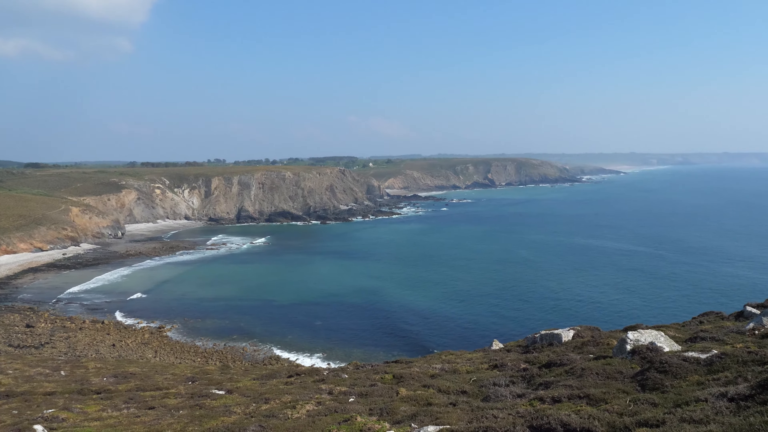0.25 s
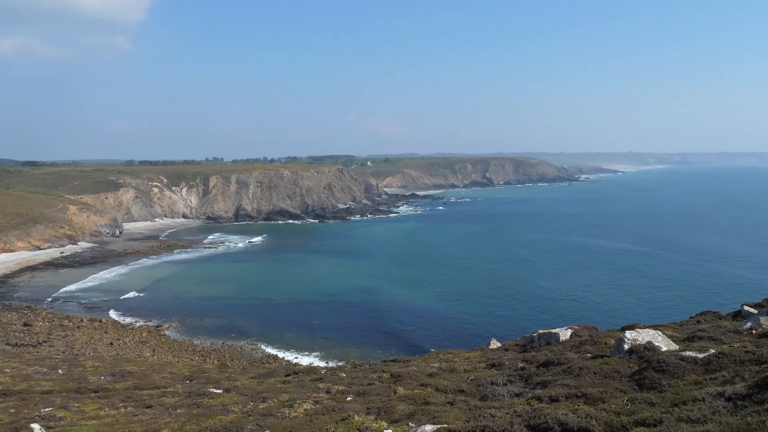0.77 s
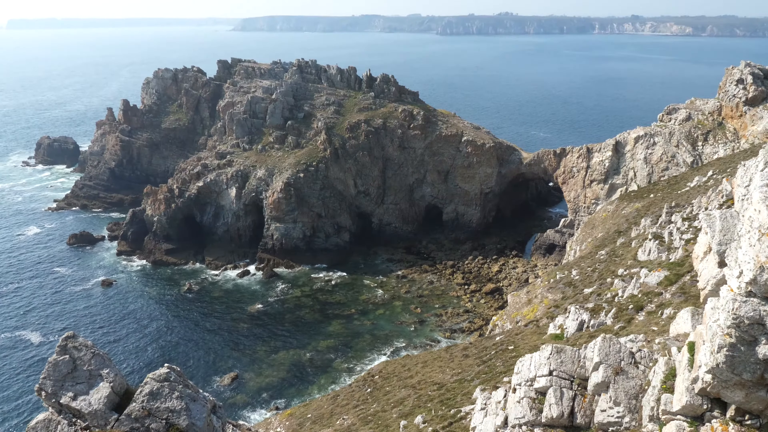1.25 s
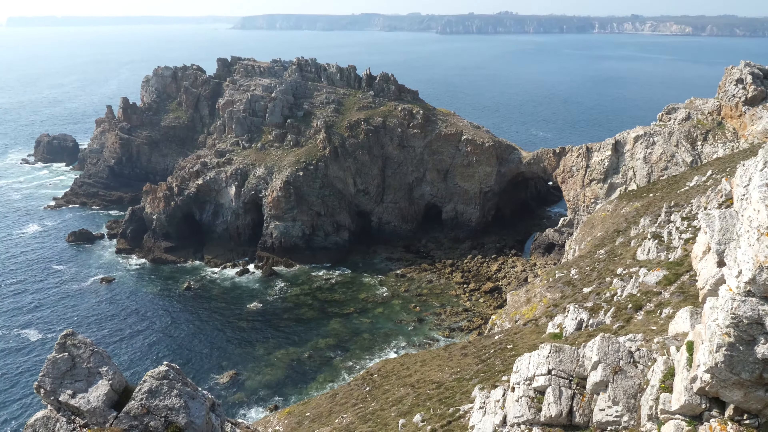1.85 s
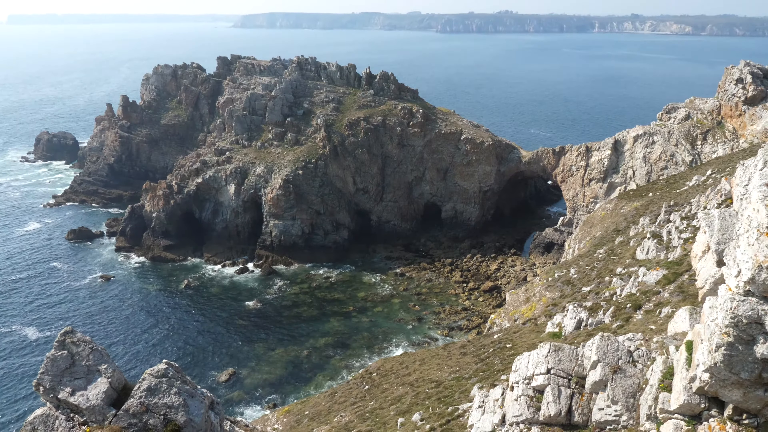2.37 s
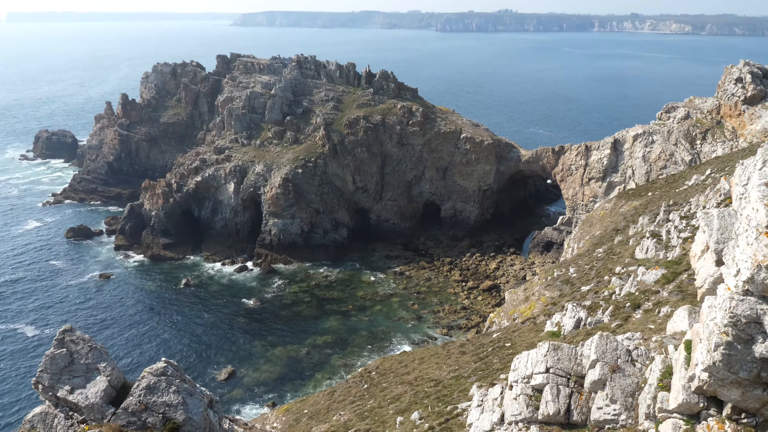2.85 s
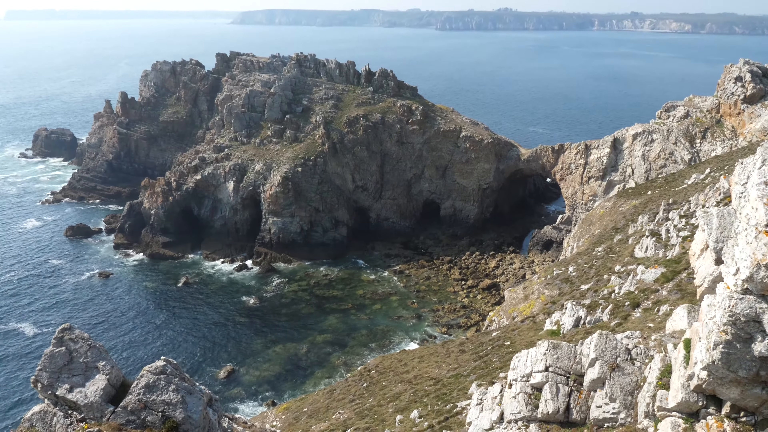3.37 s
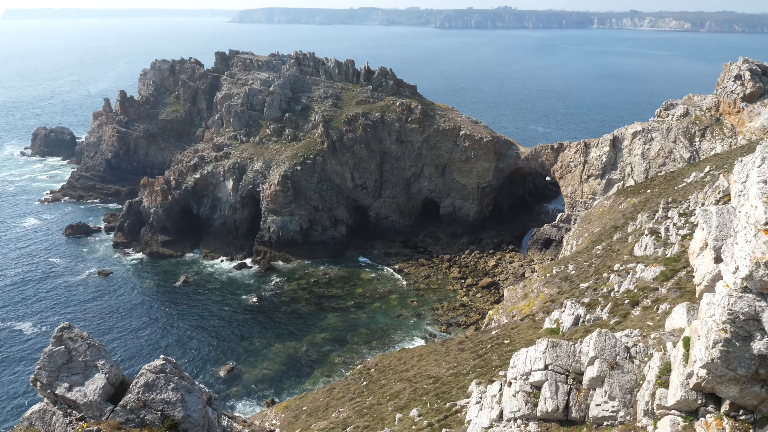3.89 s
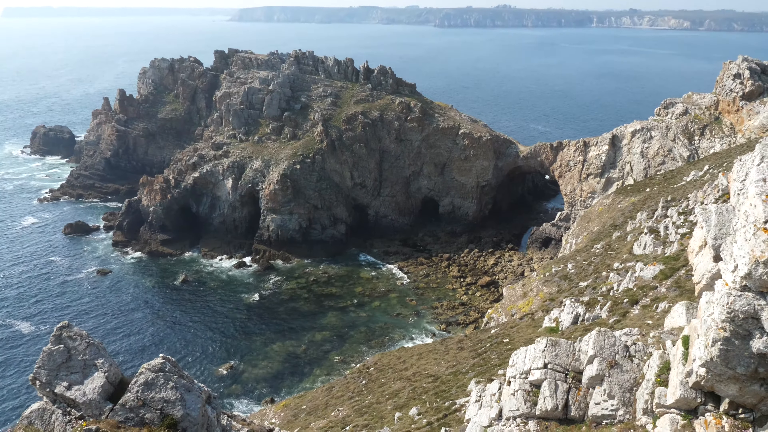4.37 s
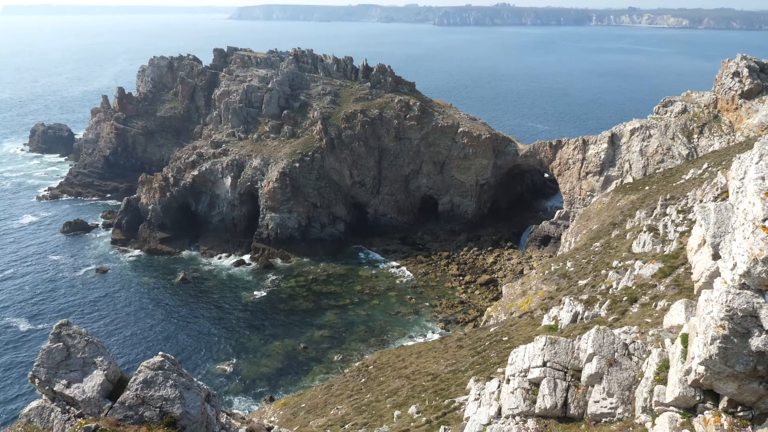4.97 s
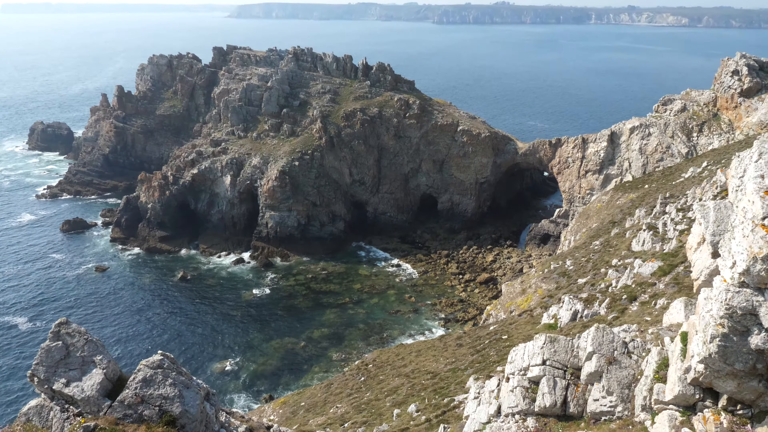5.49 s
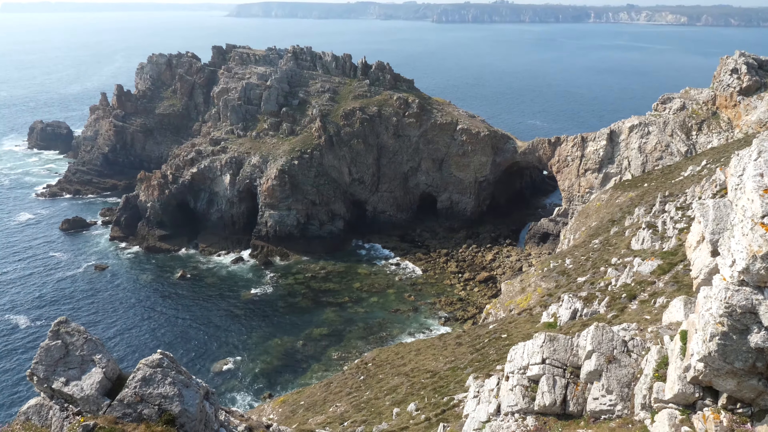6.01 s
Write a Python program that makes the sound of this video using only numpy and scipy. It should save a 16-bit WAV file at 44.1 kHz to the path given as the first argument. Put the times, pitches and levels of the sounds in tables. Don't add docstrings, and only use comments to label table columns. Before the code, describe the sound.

A far bay murmurs, cuts out, then nearer waves wash a rocky cove as a bird chirps and wind buffets the microphone.

```python
import sys
import numpy as np
from scipy import signal
from scipy.io import wavfile
from scipy.ndimage import uniform_filter1d

SR = 44100
rng = np.random.default_rng(int(sys.argv[2]) if len(sys.argv) > 2 else 0)


def attenuation_scalar(level_db):
    decades = np.asarray(level_db, float) / 20
    return 10 ** decades


def waveform_to_disk(signal):
    frames = np.transpose(np.atleast_2d(signal))
    scaled = np.clip(frames, -1, 1) * 32767
    samples = np.round(scaled).astype(np.int16)
    wavfile.write(sys.argv[1], SR, samples)


N = 275625
CUT_S, RESUME_S = .9428, 1.2187


def evened(x):
    return x / np.sqrt(np.mean(abs(x) ** 2) + 1e-20)


def read(points, hz):
    f, value = np.transpose(points)
    return np.interp(np.log(hz + 1), np.log(f + 1), value)


def add(mix, s, sound):
    part = mix[..., round(s * SR):][..., :sound.shape[-1]]
    part += sound[..., :part.shape[-1]]


def control(points):
    s, db = np.transpose(points)
    return np.interp(np.arange(N) / SR, s, db)


def bump(s, rise, fall):
    t = np.arange(N) / SR - s
    return np.exp(-np.where(t < 0, (t / rise) ** 2, t / fall))


# (frequency [Hz], likeness [0-1])
CHANNEL_LIKENESS = [(60, 1), (290, 1), (640, 1), (1100, 0.96), (2000, 0.89), (3100, .92), (6400, 0.93),
                    (7000, 0.96), (10000, .999), (10600, 0.89), (15000, 0.63)]
# (frequency [Hz], left minus right [dB])
PORT_TILT = [(60, 0.0), (130, 0.0), (290, 0.5), (640, 0.5), (1410, 2.0), (3100, 1.0), (6820, 0.5),
             (15000, 0.0)]
# (frequency [Hz], left leads by [radians])
PORT_LEAD = [(200, 0), (500, 0.18), (1030, 0.39), (2000, 0.12), (3450, -.1), (5250, .1), (6630, 0)]


def wash(colour, lo_hz, hi_hz, patchy_db, flicker_db, size=1024):
    frames, hz = 4 * N // size + 5, np.fft.rfftfreq(size, 1 / SR)
    a, b, c, d, patches = rng.standard_normal((frames, len(hz), 5)).T
    flicker = evened(uniform_filter1d(patches[0], size=2))
    patches = uniform_filter1d(patches, size=12, axis=0)
    patches = evened(uniform_filter1d(patches, size=10, axis=1))
    same = np.clip(read(CHANNEL_LIKENESS, hz), 0, 1)[:, None]
    left = a + 1j * b
    right = same * left + np.sqrt(1 - same ** 2) * (c + 1j * d)
    port = (attenuation_scalar(read(PORT_TILT, hz) / 2) * np.exp(.5j * read(PORT_LEAD, hz)))[:, None]
    shape = attenuation_scalar(read(colour, hz)) * (hz > colour[0][0] / 2)
    drift = attenuation_scalar(patchy_db * patches + flicker_db * flicker)
    z = np.array([left * port, right / port]) * shape[:, None] * drift
    band = (hz > lo_hz) & (hz < hi_hz)
    whole_to_band = np.sqrt(np.sum(shape ** 2) / np.sum(shape[band] ** 2))
    noise = signal.istft(z, nperseg=size, noverlap=3 * size // 4)[1][:, :N]
    return whole_to_band * evened(noise)


# (time [s], lift [dB], rise [s])
SPLASHES = [
    (.02, 3.5, .03),
    (1.3, -0.5, .05),
    (1.72, 2.5, 0.17),
    (3.6, 1.5, .08),
    (4.03, 0.5, .1),
    (5.17, 2, .1),
    (5.72, 1.5, .05),
    (6.02, 1, .05),
]


def surf(roar, fizz, swell, foam_db, follow):
    body = wash(roar + [(7500, -65)], 300, 2240, patchy_db=0.53, flicker_db=0.18)
    foam = wash([(3500, -35.5)] + fizz, 5390, 11000, patchy_db=-1.0, flicker_db=0.0)
    sea_db = control(swell)
    lift_db = sum(db * bump(s, rise, 1.2 * rise) for s, db, rise in SPLASHES)
    fizz_db = foam_db + follow * (sea_db - np.mean(swell, axis=0)[1]) + lift_db
    return attenuation_scalar(sea_db) * body + attenuation_scalar(fizz_db) * foam


# (frequency [Hz], level [dB per Hz])
COVE_ROAR = [(29, -66), (50, -74), (101, -22), (157, -5.5), (248, -2.5), (378, 0), (542, -1), (690, -4),
             (1230, -3.5), (1600, -10), (2290, -13), (2800, -20.5), (4100, -17.5), (5110, -31), (6000, -35),
             (7800, -54), (13200, -120)]
# (frequency [Hz], level [dB per Hz])
COVE_FIZZ = [(2650, -39), (4500, -2.5), (5170, -2), (6040, -10.5), (6900, -11), (7400, -14), (7750, -13.5),
             (7950, -10), (8250, -12), (8550, -13.5), (9000, -14), (11000, -23), (14600, -30), (15500, -34)]
# (time [s], roar level [dB])
COVE_SWELL = [(1.22, -38), (1.42, -35.5), (1.67, -35), (2.3, -35.5), (2.95, -35), (3.06, -35.5),
              (3.15, -35), (3.6, -34.5), (4.3, -34.6), (5.0, -33.5), (5.4, -33), (6.25, -33.5)]


def rocky_cove():
    return surf(COVE_ROAR, COVE_FIZZ, COVE_SWELL, foam_db=-60, follow=.33)


# (frequency [Hz], level [dB per Hz])
BAY_ROAR = [(29, -70.5), (50, -58), (93, -19), (300, -4.5), (450, -3.5), (730, -5.5), (1310, -9),
            (1700, -17), (2260, -22.5), (3100, -32.5), (3800, -28), (4700, -38), (5800, -38.5)]
# (frequency [Hz], level [dB per Hz])
BAY_FIZZ = [(2650, -25.5), (4500, 0), (4890, -0.5), (5770, -10.5), (6200, -7), (7950, -6), (14300, -14),
            (15500, -21)]
# (time [s], roar level [dB])
BAY_SWELL = [
    (0, -42.5),
    (.3, -42.5),
    (.6, -42),
    (.94, -42.5),
]


def far_bay():
    return surf(BAY_ROAR, BAY_FIZZ, BAY_SWELL, foam_db=-72, follow=.4)


# (frequency [Hz], level [dB per Hz])
RUMBLE = [(20, -33), (45, -23), (80, -3), (130, 16), (200, -6), (350, -27.5), (600, -46)]
# (time [s], rumble level [dB])
GUSTS = [(.045, -50), (.5, -60), (.79, -55.5), (1.28, -40.5), (1.38, -57), (2.05, -50.5), (2.33, -48.5),
         (2.98, -58), (3.13, -44), (4.12, -47.5), (4.33, -55), (4.89, -54), (5.3, -48), (5.45, -57),
         (5.72, -40), (5.85, -50)]
# (time [s], peak level [dB], pitch [Hz])
THUMPS = [(.037, -44, 105), (1.223, -42, 120), (1.248, -37, 140), (1.281, -27, 160), (1.324, -39, 100),
          (1.343, -41, 130), (1.377, -40, 120), (1.387, -38, 110), (5.39, -44, 85), (5.437, -39, 110),
          (5.476, -38, 140), (5.706, -36, 120), (5.808, -38, 120), (5.97, -39, 85), (6.07, -36, 190),
          (5.699, -30, 160), (5.727, -27, 115), (5.752, -26, 180), (5.868, -29, 165), (5.921, -28, 175),
          (6.125, -33, 165)]


def wind():
    breeze_db, gust_rise_s, gust_fall_s = -65, .033, .055
    blow = attenuation_scalar(breeze_db) + sum(attenuation_scalar(db) * bump(s, gust_rise_s, gust_fall_s) for s, db in GUSTS)
    out = attenuation_scalar(-4.5) * blow * wash(RUMBLE, 30, 130, patchy_db=-0.5, flicker_db=1.0, size=2048)
    t = np.arange(-.012, .06, 1 / SR)
    swell = np.where(t < 0, np.exp(-(t / .004) ** 2), np.exp(-t / .0073))
    for s, db, hz in THUMPS:
        port_db = db + np.array([[1.1], [-1.1]])
        add(out, s + t[0], attenuation_scalar(port_db) * swell * np.cos(2 * np.pi * hz * t))
    wind_cut = signal.butter(2, 80, "highpass", fs=SR, output="sos")
    return signal.sosfilt(wind_cut, out)


def note(length, start_hz, rest_hz, db):
    t = np.arange(0, length, 1 / SR)
    kept = .14
    hz = rest_hz + (start_hz - rest_hz) * (kept + (1 - kept) * np.exp(-t / .0115))
    swell = np.sin(np.pi * t / length) ** .4
    return np.sqrt(2) * attenuation_scalar(db) * swell * np.sin(2 * np.pi * np.cumsum(hz) / SR)


# (time [s], first note [s], start pitch [Hz], first level [dB], second level [dB])
CHIRPS = [
    (1.996, .044, 5500, -56, -62),
    (2.238, .04, 5520, -56.5, -57),
    (2.566, .046, 5500, -55.5, -52),
    (2.836, .035, 5270, -48, -48),
    (3.078, .038, 5420, -52, -49.5),
    (3.297, .048, 5900, -51, -54),
    (3.538, .03, 5720, -52.5, -99),
    (3.807, .022, 5150, -53.5, -99),
    (4.133, .026, 5230, -54, -54.5),
]


def bird():
    out = np.zeros(N)
    pause_s = .022
    for s, length, start_hz, db, second_db in CHIRPS:
        add(out, s, note(length, start_hz, 4920, db))
        add(out, s + length + pause_s, note(.03, 5065, 4975, second_db))
    t = np.arange(4000) / SR
    blur = rng.standard_normal((1, len(t))) * attenuation_scalar(-60 * t / .1)
    blur /= np.linalg.norm(blur[0])
    direct = out * attenuation_scalar(np.array([[.4], [-.4]]))
    return direct + attenuation_scalar(-17) * signal.fftconvolve(out[None], blur, axes=1)[:, :N]


# (centre [Hz], width [Hz])
GRIP, SHELL, SEAM, BUTTON = (2200, 400), (4200, 1900), (8900, 3000), (11400, 3600)
# (centre [Hz], width [Hz], peak level [dB])
CLICK = [
    (5500, 8600, -26),
    (4000, 2400, -33),
    (7000, 500, -46),
    (2000, 1800, -33),
    (11200, 1500, -41),
    (14300, 2500, -48),
]
# (time [s], peak level [dB], part)
SNAPS = [(.017, -41, SHELL), (.02, -52, SEAM), (.628, -48, SHELL), (.636, -48, SHELL), (.6573, -42, GRIP),
         (1.857, -56, BUTTON), (3.909, -50, BUTTON), (3.954, -33, GRIP), (3.955, -52, SEAM),
         (3.969, -35, GRIP), (4.15, -35, GRIP), (5.706, -54, SEAM)]


def ticks():
    click_s, rebound_s, rebound_db = .6731, .0068, -21
    creak_s, slip_s, creak_db, fade_db = 3.9763, .0059, -42, -.7
    click = [(click_s, db, (hz, width)) for hz, width, db in CLICK]
    rebound = [(click_s + rebound_s, CLICK[0][2] + rebound_db, part) for part in (SHELL, BUTTON)]
    creak = [(creak_s + k * slip_s, creak_db + k * fade_db - 4 * (k % 3 > 0), BUTTON) for k in range(7)]
    rows = click + rebound + creak + SNAPS
    out, t = np.zeros((2, N)), np.arange(400) / SR
    for s, db, (hz, width) in rows:
        edges = np.clip([hz - width / 2, hz + width / 2], 300, 18000)
        snap = (t == 0) + rng.standard_normal(400) * attenuation_scalar(-21 - 60 * t / .009)
        ring = signal.sosfilt(signal.butter(2, edges, "bandpass", fs=SR, output="sos"), snap)
        ring /= abs(ring).max()
        in_cove = s > CUT_S
        pan_db = -.5 if in_cove else -4.5
        late_s = (in_cove and hz > 5000) / SR
        add(out[0], s, ring * attenuation_scalar(db + pan_db / 2))
        add(out[1], s + late_s, ring * attenuation_scalar(db - pan_db / 2))
    return out


def scene():
    first = np.arange(N) < CUT_S * SR
    return np.where(first, far_bay(), rocky_cove()) + wind() + bird() + ticks()


# (time [s], depth [dB], recovery [s])
DUCKS = [
    (5.708, 8, .03),
    (6.03, 2, .05),
]


def gain_control(dry):
    t = np.arange(N) / SR
    duck_db = sum(db * np.exp(-np.maximum(t - s, 0) / back) * (t > s) for s, db, back in DUCKS)
    return dry * attenuation_scalar(-uniform_filter1d(duck_db, size=100))


# (shared level [dB], level opposed in the channels [dB])
HISS_DB = [
    (-73.5, -73),
    (-80, -90),
]


def amplifier_hiss():
    treble = signal.butter(8, 10300, "highpass", fs=SR, output="sos")
    shared, opposed = signal.sosfilt(treble, rng.standard_normal((2, N)))
    opposed = opposed * np.array([[1], [-1]])
    return [attenuation_scalar(shared_db) * shared + attenuation_scalar(opposed_db) * opposed for shared_db, opposed_db in HISS_DB]


def band_limit(bay, cove):
    wide, narrow = [signal.firwin(1023, hz, window=("kaiser", 9), fs=SR)[None] for hz in (15730, 15170)]
    open_share, block = .14, 1024
    opened = np.repeat(rng.random(N // block + 1) < open_share, block)[:N]
    opened = uniform_filter1d(uniform_filter1d(1. * opened, size=500), size=500)
    top = opened * signal.oaconvolve(cove, wide - narrow, "same")
    return signal.oaconvolve(bay, wide, "same"), signal.oaconvolve(cove, narrow, "same") + top


def top_cut(x):
    return signal.sosfilt(signal.butter(12, 16030, fs=SR, output="sos"), x)


def record(dry):
    t = np.arange(N) / SR
    ducked = gain_control(dry)
    bay_hiss, cove_hiss = amplifier_hiss()
    bay, cove = band_limit(ducked + bay_hiss, ducked + cove_hiss)
    joined = bay * (t < CUT_S) + cove * (t > RESUME_S)
    return top_cut(joined)


dry = scene()
out = record(dry)
waveform_to_disk(out)
```